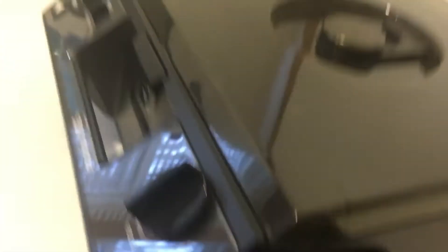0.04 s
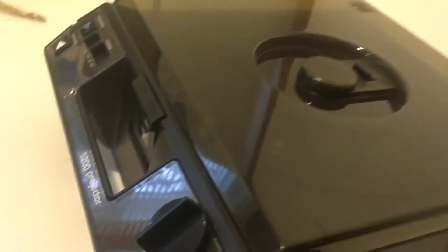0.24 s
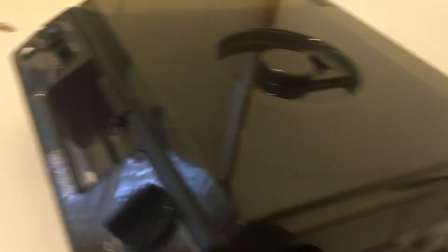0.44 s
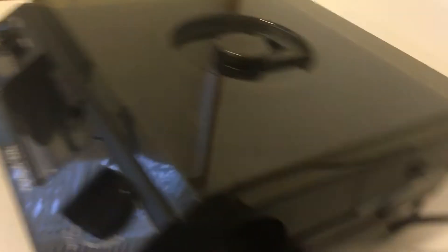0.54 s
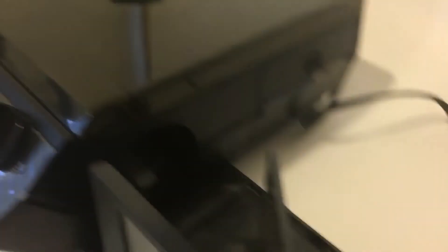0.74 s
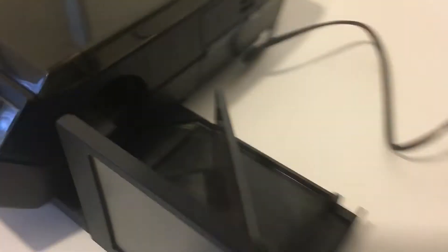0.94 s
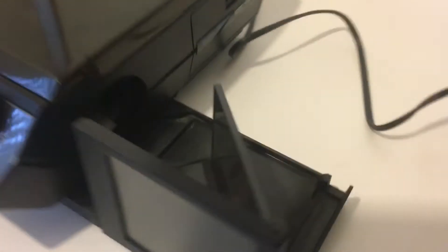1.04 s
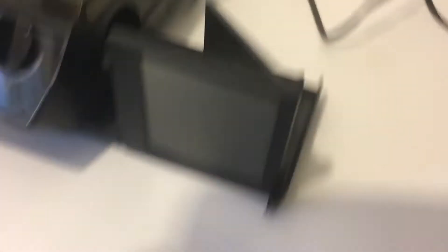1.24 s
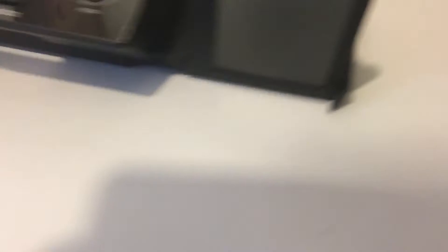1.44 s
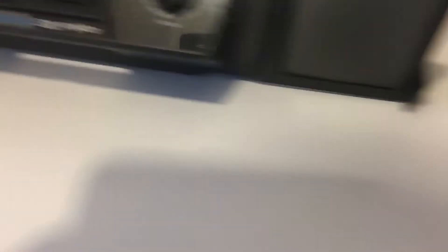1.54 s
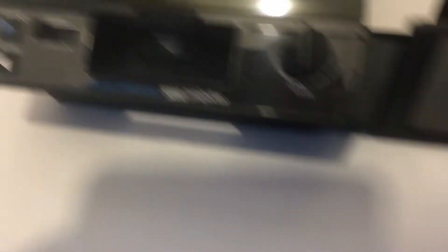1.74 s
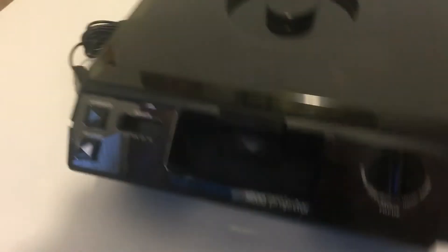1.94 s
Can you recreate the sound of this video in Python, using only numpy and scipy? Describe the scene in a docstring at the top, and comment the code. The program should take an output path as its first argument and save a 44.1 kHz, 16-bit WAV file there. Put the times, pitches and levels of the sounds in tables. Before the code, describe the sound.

Slide projector changer clicks and knocks up close, followed by quiet and a faint finger rub.

```python
"""Slide projector worked by hand

Close by, the changer of a plastic projector scrapes and clicks along its track, hits its stop
with a hard knock and rattles back, each knock ringing the hollow case. Then a quiet room
remains, with low handling rumble, a few soft ticks and a brief, faintly squeaky finger rub."""
import sys
import numpy as np
from scipy import signal
from scipy.fft import rfft, irfft, next_fast_len
from scipy.io import wavfile
from scipy.ndimage import map_coordinates

SR = 44100
rng = np.random.default_rng(int(sys.argv[2]) if len(sys.argv) > 2 else 0)


def master(y):
    """Save y as 16-bit WAV."""
    cut = np.clip(np.atleast_2d(y).T, -1, 1)
    pcm = np.round(cut * 32767)  # scale
    wavfile.write(sys.argv[1], SR, pcm.astype(np.int16))


N = 88200

# Envelope of the changer's friction in its track: time_s, level_db
SCRAPE_ENVELOPE = [(0, -40.5), (.045, -45), (.056, -48), (.068, -40.5), (.125, -28.5), (.155, -36),
                   (.21, -36), (.25, -45.5), (.31, -38.5), (.39, -52.5), (.44, -61)]
# Boxy tone of that scrape: frequency_hz, gain_db
SCRAPE_EQ = [(90, -10), (165, 2), (240, -15), (350, 10), (520, -5.5), (700, -5), (1300, -10), (3000, -17),
             (9000, -34), (15000, -44.5)]
# Uneven swells of the handling rumble: time_s, level_db
RUMBLE_ENVELOPE = [(0.0, -49.5), (0.15, -32), (0.21, -50), (0.28, -32), (0.36, -47), (0.38, -29.5),
                   (0.41, -39), (0.62, -47), (0.68, -35), (0.71, -55), (0.75, -39.5), (0.98, -40),
                   (1.01, -35.5), (1.11, -56), (1.15, -42), (1.19, -63), (1.25, -40), (1.34, -50),
                   (1.74, -35.5), (1.92, -39.5), (1.97, -33.5), (2.0, -74)]
# Deep tone of the rumble, ahead of its low and high cuts: frequency_hz, gain_db
RUMBLE_EQ = [(20, -28), (33, -11), (48, 1), (70, 2.5), (95, -4.5), (130, -13), (200, -30), (400, -51)]
# Nearly steady bed of room air: time_s, level_db
AIR_ENVELOPE = [(0, -52), (.8, -54.5), (1.2, -52.5), (1.6, -52.5), (2, -51.5)]
# Dull tone of the air: frequency_hz, gain_db
AIR_EQ = [(60, -18), (120, 2), (180, -9.5), (250, -1), (400, -12), (620, -9.5), (850, -15.5), (1300, -19),
          (2000, -19.5), (3200, -28), (5000, -33), (9000, -38.5), (16000, -45.5)]
# Short decay of the room: frequency_hz, t60_s
ROOM_DECAY = [(150, 0.2), (600, 0.16), (1500, 0.096), (4000, 0.063), (12000, 0.098)]
# Sharp clicks of the catches: start_s, level_db, ring_t60_s
CATCH_CLICKS = [(.0005, -36, 0.15), (.0073, -38, 0.074), (0.03, -35.5, 0.089), (0.041, -39, 0.034),
                (0.0698, -27, 0.032), (0.0996, -28, 0.021), (.108, -31, 0.1), (0.12, -25.5, .05),
                (.135, -33, .04), (0.14, -31.5, 0.032), (0.1624, -21, 0.08), (0.1705, -28, 0.2),
                (0.2094, -30, 0.038), (0.231, -36.5, .04), (0.249, -45, 0.031), (0.2771, -31, 0.039),
                (.308, -37, 0.031), (.315, -45, 0.016), (.3345, -44, .04), (0.341, -47, 0.027),
                (0.37, -42, .06)]
# Bright snap of a catch: frequency_hz, gain_db
CLICK_EQ = [(200, -15), (1000, -1.5), (2600, -1), (3500, 1), (4800, -4), (6200, -0.5), (7500, -7),
            (9200, -1), (10300, -11), (11300, -4.5), (13000, -14.5), (15500, -17.5)]
# Knocks of the changer; the last three columns trim layers within the knock:
# start_s, level_db, pitch_hz, clack_t60_s, boom_db, ring_db, crack_db
CHANGER_KNOCKS = [(0.0645, -28, 1670, 0.0054, 4, -11, 6), (0.0885, -27, 1500, .015, 3.5, 1, -4),
                  (.1131, -13, 1274, .028, -6.5, -0.5, -9.5), (0.178, -1, 1710, 0.014, 0.5, 1.5, 0),
                  (.2607, -19.5, 1250, .011, -4, -11, -4), (0.2945, -15, 1620, 0.0063, -1, -11, -11),
                  (0.358, -18.5, 1500, 0.0048, 0.5, -10, -9), (.4094, -17, 1510, 0.0054, 0.5, -11, -18.5)]
# Partials of the struck part: pitch_ratio, gain_db
CLACK_PARTIALS = [(1, 0.5), (1.39, -5.5), (0.68, -13)]
# Chattering contacts within one knock: delay_s, gain_db
CLACK_CONTACTS = [(0, -1), (.0058, -14), (.0092, -15.5)]
# Hard edge of a knock: frequency_hz, gain_db
CRACK_EQ = [(200, -30.5), (700, -5), (1500, -5.5), (2400, 3.5), (3400, -5.5), (4100, -1.5), (5000, -6.5),
            (6200, -5), (9000, -14.5), (15000, -26)]
# Thump of case and table answering a knock: frequency_hz, gain_db
THUMP_EQ = [(100, -19.5), (165, -22), (240, -8.5), (350, 6.5), (490, -6.5), (640, -4.5), (850, -6.5),
            (1600, -6), (2500, -16.5), (4000, -32.5), (9000, -42), (15000, -64)]
# Modes of the hollow case: pitch_hz, gain_db, t60_s
CASE_MODES = [(165.6, -15, 0.26), (314.6, 1.5, 0.1), (364, 2, 0.1), (432, -4.5, 0.11), (551, -13.5, 0.31),
              (618.6, 4, 0.099), (673.4, -7, 0.27), (939, -23, 0.062), (1052, -13, 0.046),
              (1519, -0.5, 0.063), (1656, 3, 0.042), (2072, 1, .055), (2380, -2, 0.022), (2884, -19, .06),
              (2900, -13, .06), (3830, -7.5, 0.091), (3990, -21, .05)]
# Soft ticks of the handled plastic: start_s, level_db
PLASTIC_TICKS = [(1.1672, -58), (1.2162, -50.5), (1.262, -59), (1.395, -61), (1.643, -47.5), (1.973, -57)]
# Hollow tone of a tick: frequency_hz, gain_db
TICK_EQ = [(200, -15), (600, 13.5), (1400, 0), (3500, -0.5), (7000, -4.5), (9500, -5.5), (13000, -14),
           (15500, -20)]
# Envelope of the finger rub: time_s, level_db
RUB_ENVELOPE = [(1.5, -84.5), (1.58, -72), (1.6775, -59.5), (1.681, -48.5), (1.728, -45), (1.752, -56),
                (1.786, -50), (1.814, -60), (1.848, -56.5), (1.886, -72), (1.902, -64), (2.0, -74)]
# Hissy tone of the rub: frequency_hz, gain_db
RUB_EQ = [(300, -1), (1400, -3.5), (2700, -5.5), (3600, 3), (4500, -3), (6300, -6), (7800, -15.5),
          (9200, -10), (12000, -29.5), (15500, -30)]
# Resonances of the rubbed plastic: centre_hz, width_hz, gain_db
RUB_RESONANCES = [(1456, 200, -8), (3600, 300, -7.5), (4300, 400, -15)]
# Faint squeaks within the rub: start_s, length_s, pitch_hz, level_db
RUB_SQUEAKS = [(1.678, 0.066, 3590, -47), (1.68, .055, 4310, -53.5), (1.69, 0.062, 1460, -51),
               (1.82, 0.052, 3560, -57.5), (1.887, .13, 3580, -61.5)]
# Light brush leading into the rub: time_s, level_db
BRUSH_ENVELOPE = [(1.54, -95), (1.575, -68), (1.63, -68), (1.68, -65), (1.72, -95)]


def amp(db):
    """Decibels to gain."""
    return 10 ** (np.asarray(db) / 20)


def unit(x):
    """Scale to rms 1."""
    return x / np.sqrt(np.mean(x ** 2) + 1e-20)


def along(points, hz):
    """Read (frequency_hz, value) points on a log frequency axis."""
    frequencies, values = np.transpose(points)
    return np.interp(np.log(hz + 1), np.log(frequencies + 1), values)


def envelope(points):
    """Turn (time_s, level_db) points into a gain per sample."""
    return amp(np.interp(np.arange(N) / SR, *np.transpose(points)))


def filtered(x, response):
    """Shape x with a gain that depends on frequency."""
    padded = next_fast_len(len(x) + 8192)
    return irfft(rfft(x, padded) * response(np.fft.rfftfreq(padded, 1 / SR)), padded)[:len(x)]


def noise(eq, size):
    """Noise of rms 1 coloured by an EQ curve."""
    return unit(filtered(rng.standard_normal(size), lambda hz: amp(along(eq, hz))))


def resonant_noise(centre_hz, width_hz):
    """Noise of rms 1 in one narrow resonance."""
    def bandpass(hz):
        return 1j * hz * width_hz / (centre_hz ** 2 - hz * hz + 1j * hz * width_hz)
    return unit(filtered(rng.standard_normal(N), bandpass))


def attack(t, rise_s):
    """Exponential rise towards 1."""
    return 1 - np.exp(-t / rise_s)


def fade(t, t60_s):
    """Exponential decay, 60 dB down at t60_s."""
    return np.exp(-np.log(1000) * t / t60_s)


def wobble(knots_per_s, size):
    """A smooth random curve for modulation."""
    position = np.arange(size) * knots_per_s / SR
    return map_coordinates(rng.standard_normal(4096), [position], mode="wrap")


def add(track, start_s, sound):
    """Mix a sound in at start_s."""
    part = track[max(0, round(start_s * SR)):][:len(sound)]
    part += sound[:len(part)]


def in_room(dry_hit, wet_db=-11.5, predelay_s=0.006):
    """One hit with its own short room tail."""
    hz, t, spectrum = signal.stft(rng.standard_normal(SR // 2), SR, nperseg=256)
    tail = signal.istft(spectrum * fade(t, along(ROOM_DECAY, hz)[:, None]), SR)[1]
    wet = signal.fftconvolve(dry_hit, tail / np.linalg.norm(tail))
    out = dry_hit.copy()
    add(out, predelay_s, amp(wet_db) * wet)
    return out


def friction(eq, slips_per_s, hiss_gain):
    """A grain of tiny random slips over smooth hiss, coloured by the surface."""
    slips = unit((rng.random(N) < slips_per_s / SR) * rng.standard_normal(N))
    hiss = hiss_gain * rng.standard_normal(N)
    return unit(filtered(slips + hiss, lambda hz: amp(along(eq, hz))))


def changer_scrape():
    """The changer drags grittily in its track until it comes to rest."""
    moving = np.arange(N) / SR < SCRAPE_ENVELOPE[-1][0]
    return moving * envelope(SCRAPE_ENVELOPE) * friction(SCRAPE_EQ, slips_per_s=900, hiss_gain=0.7)


def handling_rumble(evenness=0.35, low_cut_hz=36, high_cut_hz=170):
    """A hand-held microphone moves, adding swells of low end."""
    def bass_band(hz):
        return hz ** 4 / (hz ** 4 + low_cut_hz ** 4) / (1 + (hz / high_cut_hz) ** 4)
    rumble = noise(RUMBLE_EQ, N)
    compressed = unit(rumble / (np.abs(signal.hilbert(rumble)) + 0.2) ** evenness)
    return filtered(envelope(RUMBLE_ENVELOPE) * compressed, bass_band)


def room_air():
    """The air of the room lays a faint noise bed under everything."""
    return envelope(AIR_ENVELOPE) * noise(AIR_EQ, N)


def catch_clicks(spike_db=6, spike_t60_s=0.0085, ring_db=-4):
    """The catches make small hard contacts: a bright spike and a short dense ring."""
    out, t = np.zeros(N), np.arange(SR // 3) / SR
    for start_s, level_db, ring_t60_s in CATCH_CLICKS:
        decay = amp(spike_db) * fade(t, spike_t60_s) + amp(ring_db) * fade(t, ring_t60_s)
        click = attack(t, rise_s=0.001) * decay * noise(CLICK_EQ, len(t))
        add(out, start_s, amp(level_db) * in_room(click))
    return out


def changer_knocks(crack_mix_db=-14.5, clack_mix_db=-2, thump_mix_db=-11, thump_delay_s=0.004):
    """Each impact layers a noisy crack, a chattering clack and the thump and ring of the case."""
    out, t = np.zeros(N), np.arange(SR // 2) / SR
    for start_s, level_db, pitch_hz, clack_t60_s, boom_db, ring_db, crack_db in CHANGER_KNOCKS:
        hit = amp(crack_mix_db + crack_db) * fade(t, t60_s=0.067) * noise(CRACK_EQ, len(t))
        clack = sum(amp(db) * fade(t, clack_t60_s / ratio) * np.sin(2 * np.pi * pitch_hz * ratio * t)
                    for ratio, db in CLACK_PARTIALS)
        for delay_s, contact_db in CLACK_CONTACTS:
            add(hit, delay_s, amp(clack_mix_db + contact_db) * attack(t, rise_s=0.0001) * clack)
        thump = attack(t, rise_s=0.0051) * fade(t, t60_s=0.046) * noise(THUMP_EQ, len(t))
        add(hit, thump_delay_s, amp(thump_mix_db + boom_db) * thump)
        add(out, start_s, amp(level_db) * (in_room(hit) + case_ring(t, boom_db, ring_db)))
    return out


def case_ring(t, boom_db, ring_db, mix_db=-17.5, scatter_db=1):
    """The hollow case answers a knock: high modes ring at once, low ones boom just after."""
    boom_below_hz, boom_delay_s, build_cycles = 900, 0.0018, 1.15
    out = np.zeros(len(t))
    for pitch_hz, gain_db, t60_s in CASE_MODES:
        delay_s, drive_db = (boom_delay_s, boom_db) if pitch_hz < boom_below_hz else (0, ring_db)
        mode = attack(t, build_cycles / pitch_hz) * fade(t, t60_s) * np.sin(2 * np.pi * pitch_hz * t)
        add(out, delay_s, amp(mix_db + gain_db + drive_db + rng.normal(0, scatter_db)) * mode)
    return out


def plastic_ticks():
    """Light touches on the plastic, softer and duller than the catches."""
    out, t = np.zeros(N), np.arange(SR // 3) / SR
    shape = 2 * attack(t, rise_s=0.002) * fade(t, t60_s=0.042)
    for start_s, level_db in PLASTIC_TICKS:
        add(out, start_s, amp(level_db) * in_room(shape * noise(TICK_EQ, len(t))))
    return out


def finger_rub():
    """A finger brushes, then rubs on resonant plastic, breaking into squeaks."""
    hiss = friction(RUB_EQ, slips_per_s=9000, hiss_gain=1.3)
    rings = sum(amp(db) * resonant_noise(hz, width_hz) for hz, width_hz, db in RUB_RESONANCES)
    rub = envelope(RUB_ENVELOPE) * unit(hiss + rings) + finger_squeaks()
    brush = envelope(BRUSH_ENVELOPE) * resonant_noise(centre_hz=6340, width_hz=690)
    return rub + brush


def finger_squeaks(pitch_waver=0.025, knots_per_s=600, flutter_db=3.1, edge_s=0.006):
    """The rubbing draws out thin tones that waver quickly in pitch and level."""
    out = np.zeros(N)
    for start_s, length_s, pitch_hz, level_db in RUB_SQUEAKS:
        t = np.arange(int(length_s * SR)) / SR
        wavering_hz = pitch_hz * (1 + pitch_waver * wobble(knots_per_s, len(t)))
        gate = np.clip(np.minimum(t, length_s - t) / edge_s, 0, 1)
        gain = amp(level_db + flutter_db * wobble(knots_per_s / 2, len(t)))
        add(out, start_s, gate * gain * np.sin(2 * np.pi * np.cumsum(wavering_hz) / SR))
    return out


def scene():
    """Mechanism, finger touches and background in one mono mix."""
    mechanism = changer_knocks() + catch_clicks() + changer_scrape()
    touches = plastic_ticks() + finger_rub()
    background = handling_rumble() + room_air()
    return (mechanism + touches + background)[None]


def record(dry):
    """A brick-wall low-pass trims the very top of the mix."""
    cutoff_hz = 15900
    return filtered(dry[0], lambda hz: hz < cutoff_hz)[None]


dry = scene()
out = record(dry)
master(out)
```